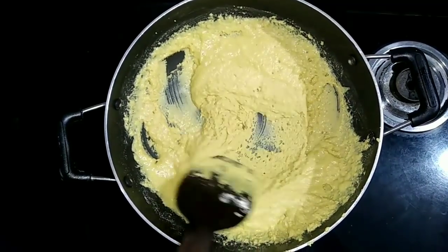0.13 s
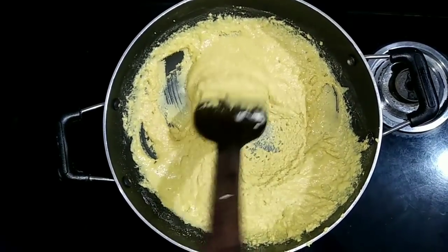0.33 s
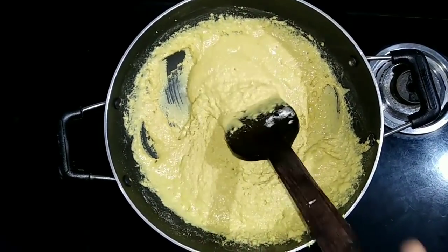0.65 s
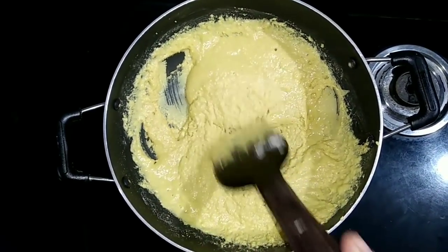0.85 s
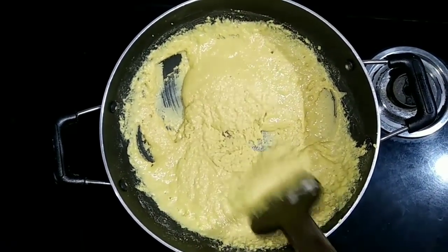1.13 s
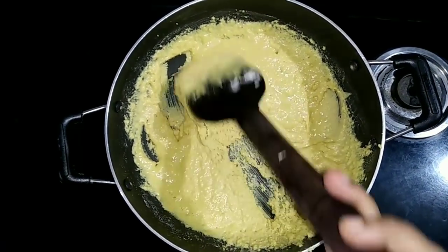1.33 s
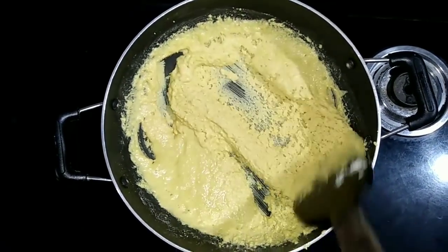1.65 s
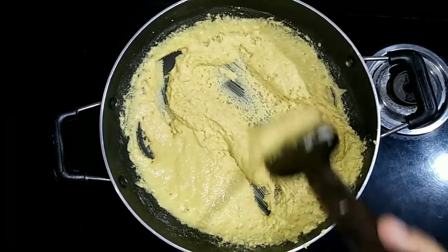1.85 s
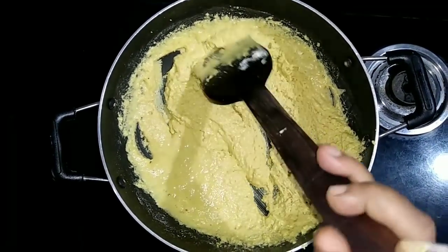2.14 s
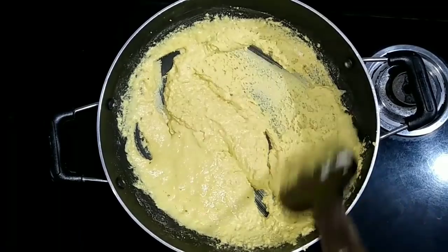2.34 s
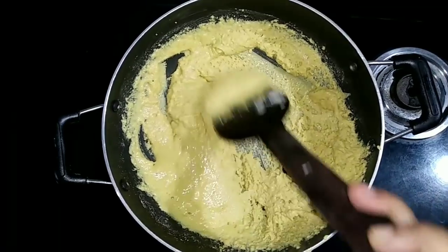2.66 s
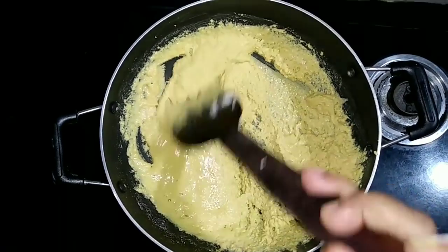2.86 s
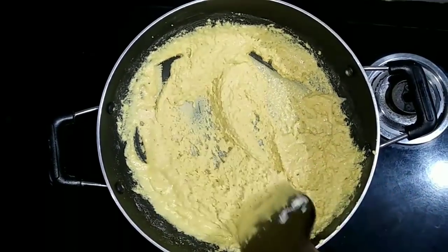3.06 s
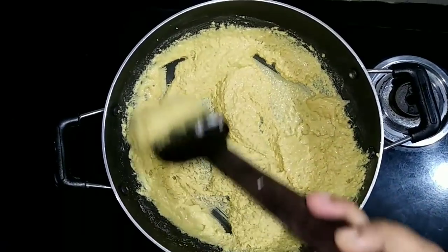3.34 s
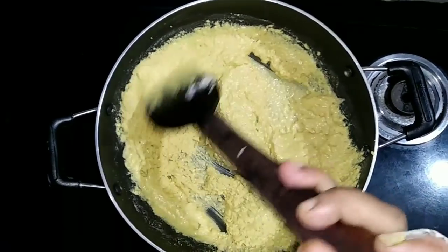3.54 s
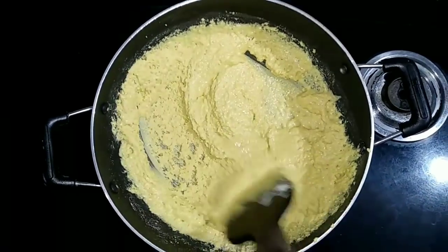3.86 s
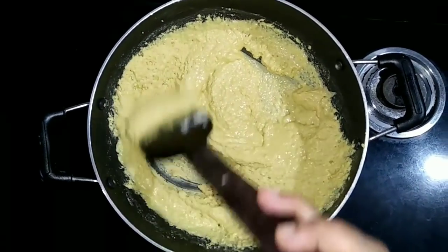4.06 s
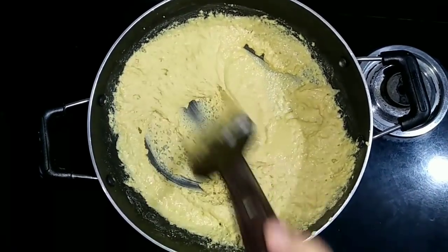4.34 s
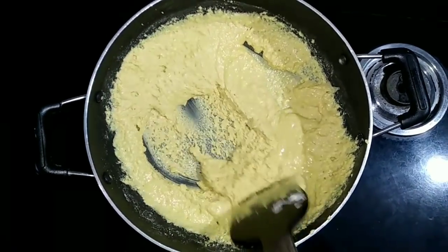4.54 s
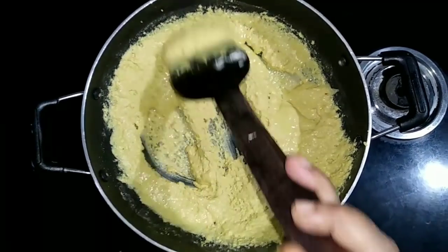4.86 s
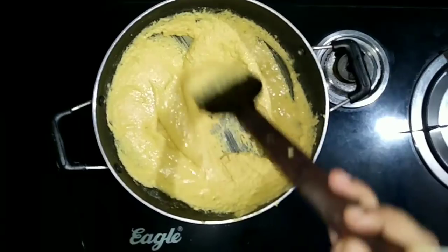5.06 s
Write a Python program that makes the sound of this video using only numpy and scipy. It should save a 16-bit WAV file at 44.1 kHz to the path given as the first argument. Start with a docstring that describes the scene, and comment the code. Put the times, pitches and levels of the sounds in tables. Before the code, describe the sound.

Short sizzling swells come and go as a wooden blade drags paste across a metal pan, nearly silent between strokes. Dull wooden knocks mark many touches, some with a short pan ring, and fat spits sharply. A very faint low burner flutter lies beneath. Near the end the stirring thins, pauses briefly, resumes, and the pan rattles on its support. Close microphones, small room with short reflections.

```python
"""A sizzle comes first, over a burner's low flutter: a wooden spatula stirs flour paste roasting in ghee.
Each stroke drags over the metal pan and bares hot metal, where fat flares into filtered random clicks.
Wood lands in dull knocks: damped sines, with the ring of the pan where the blade reaches metal.
An early rasp excites narrow resonances; steam is a band of noise. Late on come two soft low pops,
a short hush, then a last stroke and a burst of clattering metal modes, close by in a small kitchen."""
import sys
import numpy as np
from scipy import signal
from scipy.fft import rfft, irfft
from scipy.io import wavfile
from scipy.ndimage import uniform_filter1d

SR = 44100
rng = np.random.default_rng(int(sys.argv[2]) if len(sys.argv) > 2 else 0)


def digitize_waveform(pressure):
    """Quantize a signal to 16-bit integers and store it at the path in sys.argv[1].

    Rows of a 2-D input are taken as channels; values are limited to [-1, 1].
    """
    field = np.atleast_2d(pressure).T
    bounded = np.clip(field, -1, 1)
    quanta = np.round(bounded * 32767).astype(np.int16)
    wavfile.write(sys.argv[1], SR, quanta)


N = 228894
TIME = np.arange(N) / SR
HZ = np.fft.rfftfreq(N, 1 / SR)
RING = TIME[:SR // 2]  # half a second of time, for single blows and reflections


def amp(db):
    """Decibels to gain."""
    return 10 ** (np.asarray(db) / 20)


def unit(x):
    """Scales to rms 1."""
    return x / np.sqrt(np.mean(x ** 2) + 1e-20)


def read(points, hz):
    """Reads a spectrum table on a log-frequency axis."""
    table_hz, value = np.transpose(points)
    return np.interp(np.log(hz + 1), np.log(table_hz), value)


def follow(rows):
    """Draws a curve table out sample by sample."""
    return np.interp(TIME, *np.transpose(rows))


def add(mix, start_s, sound):
    """Mixes a sound in at its start time, cut off at the end of the mix."""
    part = mix[..., round(start_s * SR):][..., :sound.shape[-1]]
    part += sound[..., :part.shape[-1]]


def noise_burst(db, t60):
    """Two channels of noise that start at level db and fall 60 dB in t60 seconds."""
    return amp(db - 60 * RING / t60) * rng.standard_normal((2, len(RING)))


def colour(x, spectrum):
    """Minimum-phase filter of unit power gain: the colour never sounds before its cause."""
    gain = unit(amp(read(spectrum, HZ)))
    cepstrum = irfft(np.log(gain), N)
    # folding the cepstrum onto positive time makes the filter causal
    cepstrum[1:N // 2] *= 2
    cepstrum[N // 2 + 1:] = 0
    return irfft(rfft(x) * np.exp(rfft(cepstrum)), N)


# Likeness of the two microphones. Each row: frequency in Hz, left-right correlation (held within -1 to 1).
LIKENESS = [(60, 0.82), (300, 0.89), (700, 0.74), (1050, 0.46), (1400, 0.05), (2000, -1.24), (2600, 0.33),
            (15000, -0.5)]


def spread(x):
    """Two unrelated signals become a microphone pair: alike in the bass, mostly unlike in the treble."""
    a, b = rfft(x, N)
    same = np.clip(read(LIKENESS, HZ), -1, 1)
    mid = a * np.sqrt((1 + same) / 2)
    side = b * np.sqrt((1 - same) / 2)
    return irfft(np.array([mid + side, mid - side]), N)


def panned(x, db):
    """Leans a pair to the left by db, at equal power."""
    gains = amp(np.array([[1], [-1]]) * db / 2)
    return x * gains / np.sqrt(np.mean(gains ** 2, axis=0))


def ring(modes):
    """The answer of a set of decaying modes to one blow."""
    return sum(amp(db - 60 * RING / t60) * np.sin(2 * np.pi * hz * RING) for hz, db, t60 in modes)


def grains(per_s, uneven_db):
    """Two random trains of clicks, many small and a few large."""
    size = amp(uneven_db * np.minimum(rng.exponential(1, (2, N)), 4.5))
    sign = rng.choice([-1, 1], (2, N))
    fires = rng.random((2, N)) < per_s / SR
    return unit(size * sign * fires)


def kitchen(x, wet_db, low_t60=0.46 / 1.5, half_hz=21000):
    """Direct sound plus dense reflections; air and walls absorb the treble sooner, t60 halving by half_hz."""
    taps = rng.standard_normal((2, len(RING))) * np.clip(RING / 0.006 - 1, 0, 1)  # silent for the first 6 ms
    hz, t, bands = signal.stft(taps, SR, nperseg=256)
    decay = amp(-60 * t / low_t60 * (1 + hz[:, None] / half_hz))
    decay = decay / np.linalg.norm(decay, axis=1, keepdims=True)  # a shorter tail keeps its energy
    tail = signal.istft(bands * decay, SR)[1]
    tail = spread(tail / np.linalg.norm(tail[0]))[:, :len(RING)]
    return x + amp(wet_db) * signal.fftconvolve(np.atleast_2d(x), tail, axes=1)[:, :N]


TOUCH_S, RELEASE_DB_PER_S = 0.0028, 232  # how fast a sound starts, and dies once the blade has lifted
SQUISH_DB, SQUISH_DB_PER_S = -15, 652  # paste squashed before the touch: level below it, and rise


def envelope(timing, db, shape):
    """A faint lead-in, a quick start, a swell to the level db, a slow fade, then the release."""
    start, peak, length = timing  # start s, time to full push s, length s
    swell_db, fade_db = shape
    t = TIME - start
    squish = amp(SQUISH_DB + SQUISH_DB_PER_S * np.minimum(t, 0))
    onset = np.maximum(np.clip(t / TOUCH_S, 0, 1), squish)
    held_db = np.interp(t, [0, peak, max(length, peak + .01)], [-swell_db, 0, -fade_db])
    return onset * amp(db + held_db - RELEASE_DB_PER_S * np.maximum(t - length, 0))


HUSH_FROM_S, HUSH_TO_S, HUSH_DB = 4.73, 4.847, -26


def hush():
    """Gain that drops briefly before the last stroke, with softened edges."""
    inside = (TIME > HUSH_FROM_S) & (TIME < HUSH_TO_S)
    return amp(HUSH_DB * uniform_filter1d(1. * inside, size=200))


# Tone of the flame. Each row: frequency in Hz, level in dB per Hz.
FLAME_TONE = [(20, -42.5), (42, -19.5), (72, -8.5), (86, -14.5), (101, 2), (118, -13), (170, -13),
              (260, -30.5), (600, -37.5), (2000, -42)]
# Loudness of the flutter. Each row: time in seconds, level in dB.
FLAME_LEVEL = [(0, -73), (.42, -61), (1.9, -62.5), (2.15, -70.5), (3.6, -70), (4.4, -82.5), (4.88, -65),
               (5.03, -53)]


def burner():
    """The flame flutters low: dark noise swollen and thinned by uneven puffs at 5 to 18 Hz."""
    puffs = unit(irfft(rfft(rng.standard_normal(N)) * ((HZ > 5) & (HZ < 18)), N))
    roar = colour(spread(rng.standard_normal((2, N))), FLAME_TONE)
    flame = unit(roar * amp(6 * np.tanh(puffs)))
    return hush() * amp(follow(FLAME_LEVEL)) * flame


# start s, time to its peak s, length s; level dB; (swell dB, fade dB)
WHISTLE, WHISTLE_DB, WHISTLE_SHAPE = (4.42, 0.027, 0.31), -80, (6, 2.4)


def whistle():
    """A faint sine wavers in pitch around 1066 Hz for a moment above the flame."""
    waver = unit(uniform_filter1d(rng.standard_normal(N), size=900))
    hz = 1066 * (1 + 0.0075 * waver)
    tone = np.sin(2 * np.pi * np.cumsum(hz) / SR)
    return hush() * envelope(WHISTLE, WHISTLE_DB, WHISTLE_SHAPE) * tone


# Two soft pops. Each row: start in seconds, level in dB, low ring in Hz, low-pass corner in Hz.
SOFT_POPS = [(4.689, -42.5, 115, 890), (4.7209, -39, 128, 1420)]


def pops():
    """A soft step of pressure that swings out low."""
    out = np.zeros(N)
    for s, db, hz, bright_hz in SOFT_POPS:
        swing = np.cos(2 * np.pi * hz * RING + 1.45) * amp(-60 * RING / 0.036)
        step = 1.73 * np.exp(-RING / 0.00049)
        soft = signal.lfilter(*signal.butter(2, bright_hz, fs=SR), swing + step)
        add(out, s, amp(db) * soft)
    return out


# Contacts of the pan with its support. Each row: start in seconds, level in dB.
CONTACTS = [(5.1023, -28), (5.1101, -29), (5.1188, -29.5), (5.1226, -34.5), (5.1317, -43.5), (5.155, -36)]
# Bright modes of the clattering pan. Each row: frequency in Hz, level in dB, t60 in seconds.
RIM_MODES = [(1220, -11, 0.36), (1330, -27, 0.18), (1570.5, -0.5, 0.46), (1686, -14, 0.23), (1924, -9, .15),
             (1976, -6, .16), (2464, -4, 0.1), (2757, -12, .16), (2890, -15, 0.13), (3488, -2, 0.19),
             (5986, -3, 0.076), (7800, -20, .1), (9080, -15, 0.2)]
# Tone of the clash. Each row: frequency in Hz, level in dB per Hz.
CLASH_TONE = [(200, -17), (900, -11.5), (1250, 2), (2400, 0), (3500, -3.5), (4100, -13.5), (6000, -18.5),
              (9000, -22), (15000, -27)]


def clatter():
    """The pan chatters on its support: each contact is a brief noisy clash and a bright ring."""
    rim, rings, clashes = ring(RIM_MODES), np.zeros(N), np.zeros((2, N))
    for s, db in CONTACTS:
        add(rings, s, amp(db - 7.5) * rim)
        add(clashes, s, noise_burst(db - 1.0, t60=0.12))
    ringing = kitchen(rings, wet_db=0.0)
    clashing = kitchen(colour(spread(clashes), CLASH_TONE), wet_db=-2.5)
    return panned(ringing + clashing, db=3.0)


# Knocks of the blade. Each row: start in seconds, level in dB, thud pitch in Hz, pan ring in dB against level.
BLADE_KNOCKS = [(.812, -50, 465, -20), (1.0787, -19.5, 400, -2.5), (1.4525, -25.5, 372, -13),
                (1.474, -36.5, 257, -9), (1.513, -32.5, 340, -25), (1.830, -21.5, 346, -19),
                (1.834, -37, 152, -31), (1.845, -42.5, 69.6, -31.5), (2.135, -21.5, 314, -14),
                (2.157, -20.5, 420, -31), (2.174, -32, 392, -37), (2.3195, -26, 700, -16.5),
                (2.479, -51, 623, -3.5), (2.804, -28.5, 298, -10), (2.827, -25, 386, -20),
                (3.163, -36.5, 354, -27), (3.218, -31, 333, -9.5), (3.415, -35, 420, -24),
                (3.433, -31, 300, -15.5), (3.449, -27.5, 430, -42.5), (3.4635, -21.5, 495, -17.5),
                (3.7862, -29, 411, -14.5), (3.823, -32.5, 398, -16), (4.255, -43, 906, -24),
                (4.8515, -37.5, 477, -29.5)]
# The pan under its load of paste. Each row: frequency in Hz, level in dB, t60 in seconds.
PAN_MODES = [(394, -30.5, 0.12), (600, -14, 0.1), (946.7, -7, 0.34), (1010, -14, 0.09),
             (1527, -18.5, 0.086), (2057, -19, 0.12), (2412, -20, 0.11), (2560, -27.5, .13),
             (3220, -26.5, 0.33), (4940, -26.5, 0.21)]
# wood on metal: level relative to the pan's ring, decay
CLACK_DB, CLACK_T60_S = -5, 0.1


def knocks():
    """Wood lands through paste: a thud of a few cycles, clacking and ringing as far as it reaches metal."""
    pan, blows, clacks = ring(PAN_MODES), np.zeros((3, N)), np.zeros((2, N))
    for k, (s, db, hz, ring_db) in enumerate(BLADE_KNOCKS):
        cycles = hz * RING
        thud = np.sin(2 * np.pi * cycles) * amp(-4.6 * cycles) * (1 - np.exp(-cycles / .5))
        thud = signal.lfilter(*signal.butter(2, 0.44 * hz, "high", fs=SR), thud)
        smother = amp(ring_db + min(ring_db, 0) * RING / 0.1)  # paste that softens the ring also cuts it short
        add(blows[k % len(blows)], s, amp(db) * (1.296 * thud + smother * pan))
        add(clacks, s, noise_burst(db + ring_db + CLACK_DB, CLACK_T60_S))
    # each spot of the pan has its own reflections
    thuds = sum(kitchen(spot, wet_db=-3.5, low_t60=0.2) for spot in blows)
    clack_tone = [(200, -17), (400, 5.5), (900, 1.5), (1500, -8), (3300, -14.5), (6000, -26.5),
                  (12000, -35.5)]  # Hz, dB per Hz
    return thuds + colour(spread(clacks), clack_tone)


# Resonances of the rasp. Each row: frequency in Hz, width in Hz, level in dB before weighting by width.
RASP_BODY = [(546, 150, -6.5), (910, 74, -4.5), (1120, 68, 5.5), (1184, 31, 0.5), (1410, 260, -17),
             (1580, 59, -10), (2050, 160, -16.5), (5450, 570, -10), (6600, 610, -8.5)]
# The edge catches during the rasp. Each row: start in seconds, peak level in dB.
EDGE_CATCHES = [(.2795, -26), (.353, -27.5)]
# start s, time to full push s, length s; level dB; (swell dB, fade dB)
RASP, RASP_DB, RASP_SHAPE = (0.17, 0.13, 0.19), -35, (35, 7.8)
STEAM, STEAM_DB, STEAM_SHAPE = (.181, .006, 0.29), -47, (4.6, 32)


def rasp():
    """Quick slips of the blade's edge on dry metal excite narrow, damped resonances."""
    body = np.zeros(len(RING))
    for hz, width, db in RASP_BODY:
        decay = np.exp(-np.pi * width * RING)
        body += amp(db) * np.sqrt(width) * decay * np.cos(2 * np.pi * hz * RING)
    body = signal.lfilter(*signal.butter(2, 8000, fs=SR), body)
    slips = grains(per_s=1200, uneven_db=1.5)
    ringing = unit(signal.fftconvolve(slips, body[None], axes=1)[:, :N])
    scrape = envelope(RASP, RASP_DB, RASP_SHAPE) * ringing
    for s, db in EDGE_CATCHES:
        add(scrape, s, amp(db) * body / abs(body).max())
    return panned(scrape, db=-2)


def steam():
    """Steam hisses from under the blade: a high band of noise, well to the right."""
    hiss = colour(rng.standard_normal((2, N)),
                  [(5000, -40.0), (7600, -30), (8200, -2), (9300, 0.0), (9900, -32), (14000, -30)])
    return panned(envelope(STEAM, STEAM_DB, STEAM_SHAPE) * hiss, db=-14)


# Strokes of the spatula. Each row: start, time to full push and length in seconds,
# then the full-push levels of fine sizzle, coarse sputter and blade drag in dB.
SPATULA_STROKES = [(0.0, 0.037, 0.15, -49, -49.5, -56.5), (0.182, 0.19, 0.27, -48, -62, -54.5),
                   (0.492, 0.035, 0.22, -69, -69.5, -67.5), (0.762, 0.14, 0.23, -54, -65.5, -65.5),
                   (1.078, 0.12, 0.26, -40, -41.5, -45.5), (1.45, 0.14, 0.29, -40, -43.5, -46),
                   (1.829, 0.042, 0.21, -37, -37.5, -39.5), (2.132, 0.062, 0.27, -42, -45.5, -40),
                   (2.311, 0.0045, .13, -48, -49, -49), (2.478, 0.099, 0.22, -40.5, -47, -47),
                   (2.802, 0.12, 0.28, -42.5, -50, -47), (3.163, 0.054, 0.15, -43, -47, -48.5),
                   (3.211, 0.046, .11, -39.5, -38.5, -39.5), (3.461, 0.077, 0.21, -39.5, -42, -37.5),
                   (3.79, 0.094, 0.27, -45, -48.5, -47.5), (4.071, 0.04, 0.17, -51.5, -62.5, -60.5),
                   (4.191, 0.028, .17, -46.5, -55, -60.5), (4.503, 0.075, 0.21, -56.5, -59, -57),
                   (4.85, 0.059, 0.43, -47.5, -48, -49.5)]
# (dB gained from touching down to full push, dB lost from there until the blade lifts)
SIZZLE_SHAPE, SPUTTER_SHAPE, DRAG_SHAPE = (8.45, 19.24), (10.1, 30), (2.15, 28.1)
IDLE_SIZZLE_DB, IDLE_SPUTTER_DB = -87, -86.5  # the paste left to itself
UNSTEADY_DB = 1.2  # the hand pushes unevenly, rms


def stirring():
    """Gains of sizzle, sputter and drag: one uneven push drives all three; overlaps add in power."""
    fine, coarse, rub = amp(IDLE_SIZZLE_DB) ** 2, amp(IDLE_SPUTTER_DB) ** 2, 0
    for *timing, sizzle_db, sputter_db, drag_db in SPATULA_STROKES:
        fine = fine + envelope(timing, sizzle_db, SIZZLE_SHAPE) ** 2
        coarse = coarse + envelope(timing, sputter_db, SPUTTER_SHAPE) ** 2
        rub = rub + envelope(timing, drag_db, DRAG_SHAPE) ** 2
    wobble = unit(uniform_filter1d(rng.standard_normal(N), size=700))
    return np.sqrt([fine, coarse, rub]) * amp(UNSTEADY_DB * wobble) * hush()


# Tone of a hard drag. Each row: frequency in Hz, level in dB per Hz.
DRAG_TONE = [(100, -29), (200, -18), (290, -6), (390, -3.5), (520, -5), (700, -2.5), (1000, -13),
             (1200, -11.5), (1500, -23.5), (3000, -43.5)]


def drag(gain):
    """The blade sticks and slips over the pan, whose ring the paste smothers."""
    slips = kitchen(spread(grains(per_s=450, uneven_db=3.5)), wet_db=2)
    # a hard push moves the whole pan, a light one only rubs
    press = np.clip((20 * np.log10(gain + 1e-9) + 65.0) / 24, 0, 1)
    hard = unit(colour(slips, DRAG_TONE))
    light = unit(colour(slips, [(150, -36.5), (290, 0), (390, 0), (680, 0.5), (950, -2.0), (1200, -1.5),
                                (1600, -22.5), (3000, -38.5)]))
    return gain * (press * hard + (1 - press) * amp(-1.5) * light)


def patchy(x, depth_db):
    """Random smooth gains over time and frequency make the colour of the frying uneven."""
    bands = signal.stft(x, SR, nperseg=512)[2]
    field = rng.standard_normal(bands.shape[1:])
    field = uniform_filter1d(field, size=6, axis=0)  # smooth over frequency
    field = uniform_filter1d(field, size=7, axis=1)  # smooth over time
    return unit(signal.istft(bands * amp(depth_db * unit(field)), SR)[1][:, :N])


# Tone of the fine sizzle. Each row: frequency in Hz, level in dB per Hz.
FIZZ_TONE = [(2000, -30), (3400, -9), (4400, -10), (5200, 3), (6500, 2), (7400, -1), (9000, 2.5),
             (10500, -4.5), (12500, -8), (15700, -14.5)]
# Tone of the coarse sputter. Each row: frequency in Hz, level in dB per Hz.
SPUTTER_TONE = [(500, -12), (1000, -1), (1450, -1), (2100, -1), (2800, -0.5), (3700, -2), (4600, -0.5),
                (7000, -34)]
# Single drops of fat spit on bare metal. Each row: start in seconds, level in dB, t60 in seconds.
FAT_SPITS = [(1.245, -25.5, 0.0034), (1.279, -31, 0.004), (1.363, -39, 0.01), (1.371, -43.5, 0.0042),
             (1.548, -26, 0.033), (2.479, -35, .022), (2.732, -39.5, 0.019), (3.216, -31, 0.056),
             (3.513, -36, 0.0071), (4.028, -37, 0.0046)]
# Lean of the sizzle across the spectrum. Each row: frequency in Hz, left minus right in dB.
SIDE_TONE = [(400, -2), (1400, 1.5), (4000, 0), (5100, 2), (6200, 2), (7300, -0.5), (9000, -10),
             (11000, -2), (13000, -5), (15000, 2.5)]
# Place of the sizzle. Each row: time in seconds, left minus right in dB.
SIZZLE_PLACE = [(.3, 0), (.9, -4), (3.6, 0), (4.3, -4), (4.9, -1)]
CRACKLE_DB, CRACKLE_PER_S = -11.5, 110  # larger bubbles among the fine ones, relative to the fine sizzle
TOUCH_SPIT_DB, TOUCH_SPIT_T60_S = 0.5, 0.032  # spit at each touchdown, relative to the stroke's sizzle


def sizzle(fine_gain, coarse_gain):
    """Tiny steam bubbles burst in the fat; wetter paste adds coarser ones, and single drops spit."""
    fine = kitchen(grains(per_s=3500, uneven_db=3.0), wet_db=-3.5)
    fine = patchy(colour(fine, FIZZ_TONE), depth_db=2.5)
    coarse = kitchen(spread(grains(per_s=2000, uneven_db=3.0)), wet_db=2)
    coarse = patchy(colour(coarse, SPUTTER_TONE), depth_db=3.0)
    crackle = kitchen(grains(per_s=CRACKLE_PER_S, uneven_db=5.5), wet_db=-3)
    crackle = colour(crackle, [(700, -15.5), (2000, -4), (7000, 1), (10000, -6.5), (16000, -21.5)])
    frying = fine_gain * (fine + amp(CRACKLE_DB) * crackle) + coarse_gain * coarse
    # the first stroke is already under way, so it has no touchdown
    touches = [(row[0], row[3] + TOUCH_SPIT_DB, TOUCH_SPIT_T60_S) for row in SPATULA_STROKES[1:]]
    spits = np.zeros((2, N))
    for s, db, t60 in touches + FAT_SPITS:
        add(spits, s, noise_burst(db, t60))
    spits = colour(spits, [(400, -5.5), (1500, -9.0), (4000, -4.0), (7500, 6.0), (11000, -3), (16000, -15.0)])
    both = frying + kitchen(spits, wet_db=-6.0)
    shaded = irfft(panned(rfft(both), read(SIDE_TONE, HZ)), N)
    return panned(shaded, follow(SIZZLE_PLACE))


def scene():
    """All sources at the two microphones."""
    fine_gain, coarse_gain, drag_gain = stirring()
    background = burner() + whistle() + pops()
    metal = clatter() + knocks() + rasp() + steam()
    return background + metal + drag(drag_gain) + sizzle(fine_gain, coarse_gain)


def record(dry):
    """The microphones' low cut at 48 Hz and a steep upper band limit at 16050 Hz."""
    thin = signal.lfilter(*signal.butter(2, 48, "high", fs=SR), dry)
    lowpass = signal.firwin(511, 16050, window=("kaiser", 9), fs=SR)
    return signal.oaconvolve(thin, lowpass[None], "same", axes=1)


dry = scene()
out = record(dry)
digitize_waveform(out)
```